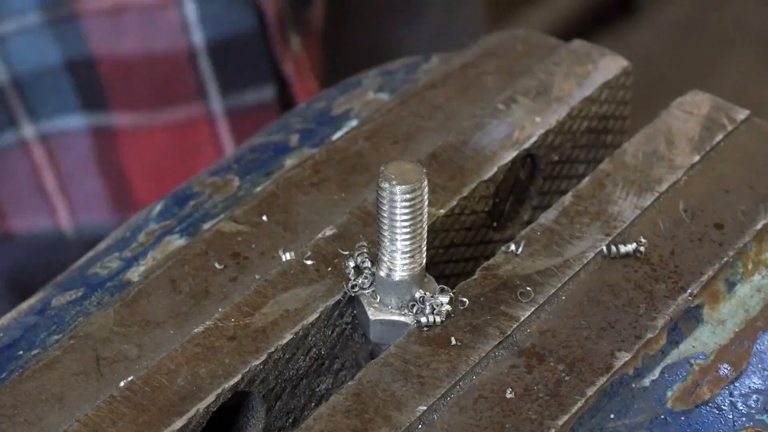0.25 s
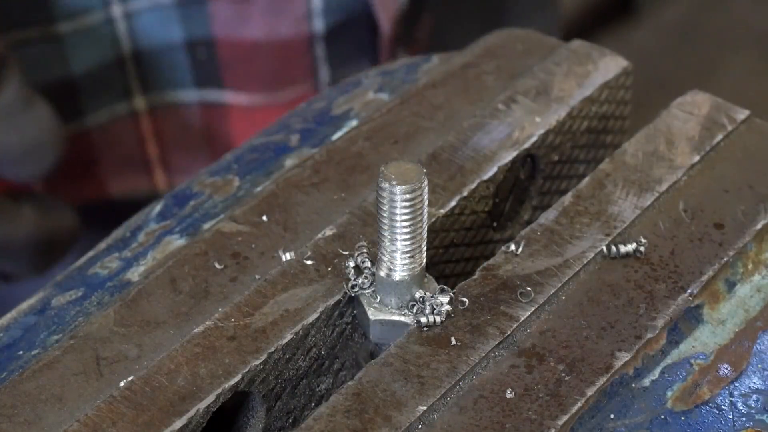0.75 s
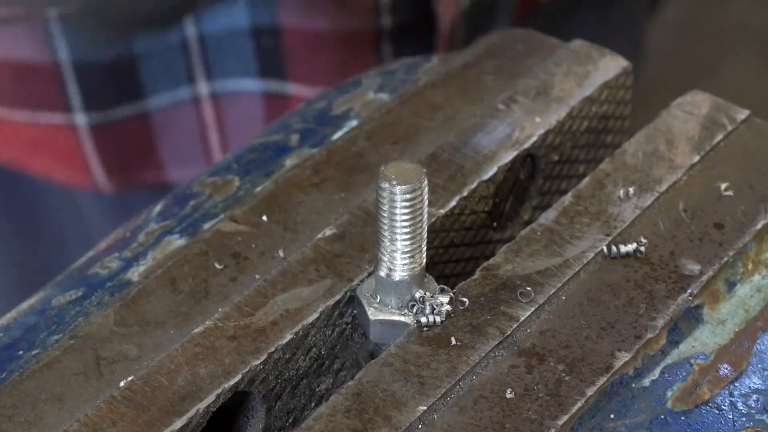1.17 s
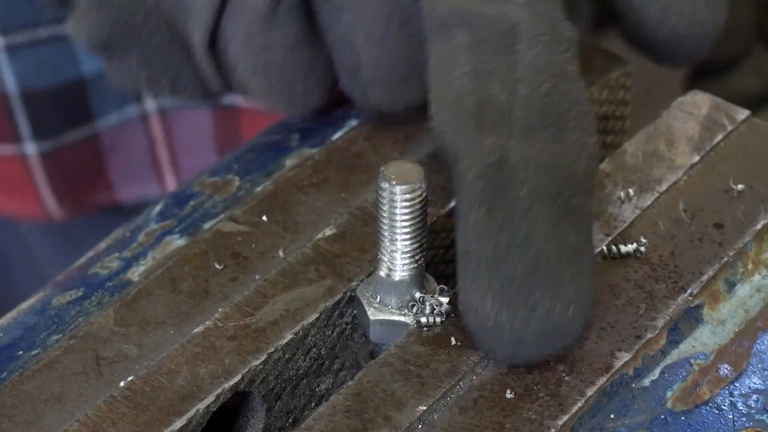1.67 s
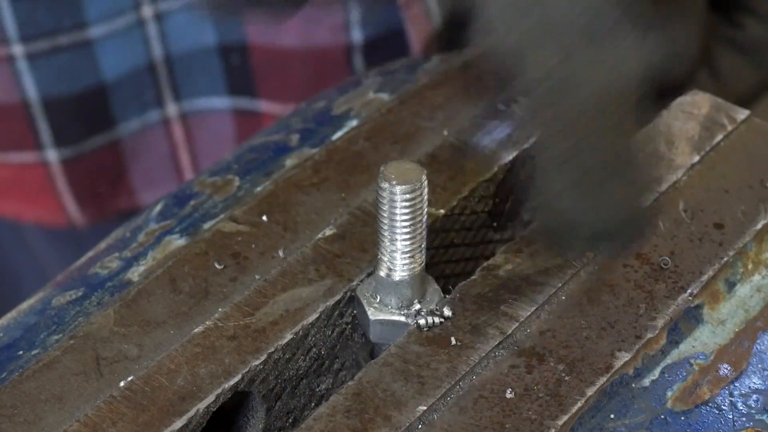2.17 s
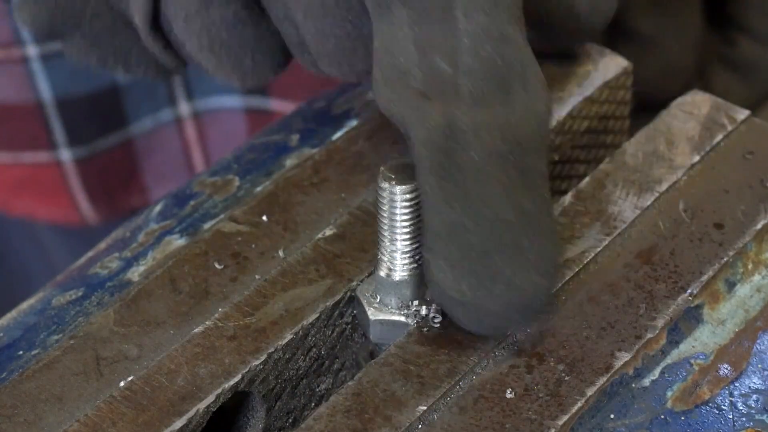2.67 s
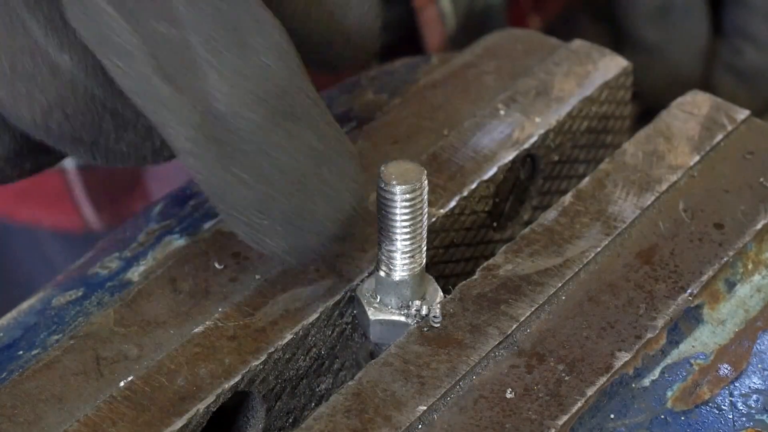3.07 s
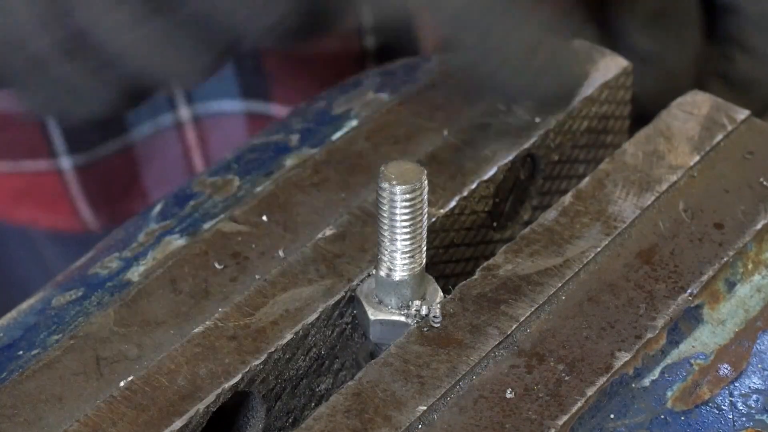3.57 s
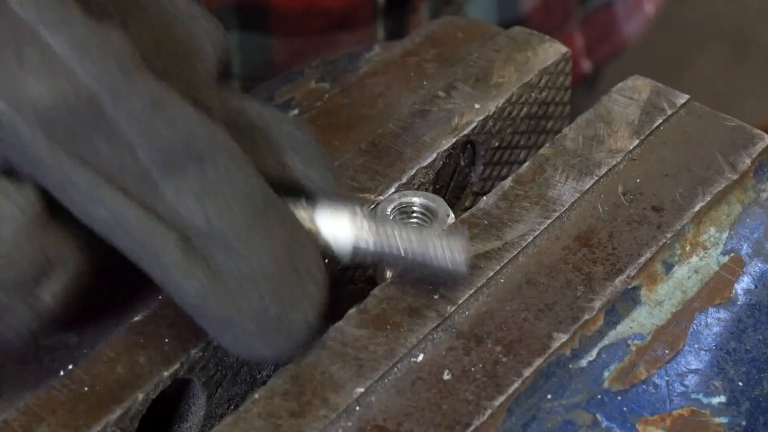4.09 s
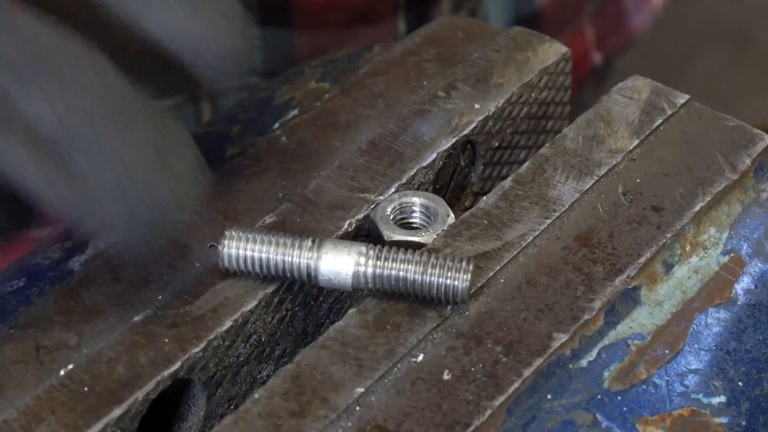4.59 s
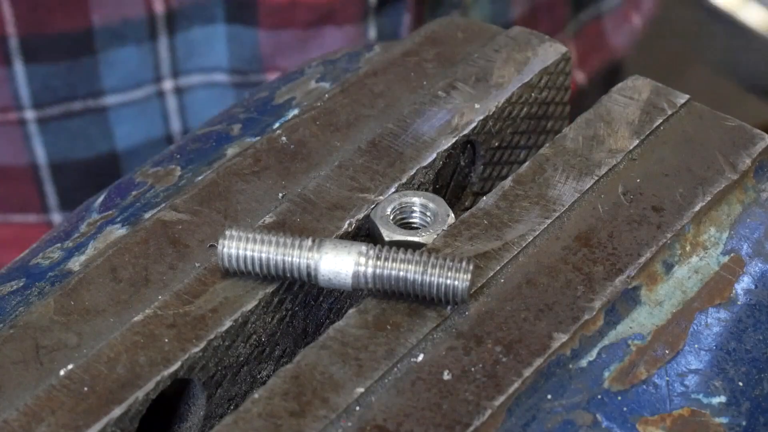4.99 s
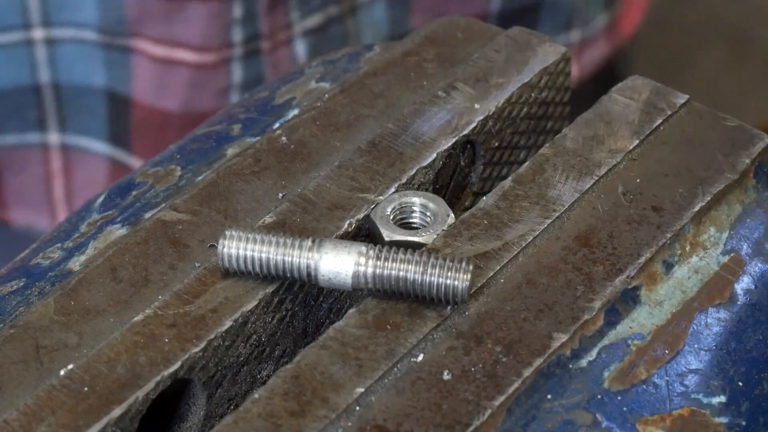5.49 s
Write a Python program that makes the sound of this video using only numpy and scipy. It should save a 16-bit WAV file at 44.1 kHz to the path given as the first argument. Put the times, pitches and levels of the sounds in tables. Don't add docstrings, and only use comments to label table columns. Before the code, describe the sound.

A quiet, small, dull workshop heard very close from the bench, nearly mono, with faint air and low body rumble. From 0 to 0.9 s there is only sleeve rustle, swelling at 0.3, soft low knocks around 0.45 to 0.55 and a barely audible creak at 0.75. At 0.92 a hand lands on wood with a dull slap. From 1.0 to 2.9 a gloved finger wipes metal chips off iron jaws in short, abrupt, gritty strokes, mid-range cloth rasp under bright swarf hiss, with dull taps and sharp ticks; the strongest scrapes come near 1.02 and 2.75. Chips ping clearly on thin sheet metal at 2.43 and 2.66, with a tiny bounce between. Lighter, drier strokes run from 2.9 to 4.0, sharpest near 3.55. A steel stud touches softly at 4.15, then clacks loudly at 4.35 with quick tiny bounces and short ringing. Faint wipes at 4.75 and 5.3 and cloth rustle fade out by 5.7.

```python
import sys
import numpy as np
from scipy import signal
from scipy.fft import rfft, irfft
from scipy.io import wavfile
from scipy.ndimage import uniform_filter1d

SR = 44100
rng = np.random.default_rng(int(sys.argv[2]) if len(sys.argv) > 2 else 0)


def store_wav(level_fs):
    pcm = np.round(np.clip(np.atleast_2d(level_fs), -1, 1) * 32767)
    wavfile.write(sys.argv[1], SR, pcm.T.astype(np.int16))


def boost(x):
    u = np.asarray(x, float) / 20
    return 10 ** u


N = 253134


def level(x, db):
    return x * boost(db) / np.sqrt(np.mean(x ** 2))


def band(x, lo_hz, hi_hz):
    return signal.sosfilt(signal.butter(2, [lo_hz, min(hi_hz, .45 * SR)], "band", fs=SR, output="sos"), x)


def colour(x, spectrum):
    hz, db = np.transpose(spectrum)
    grid = np.arange(1, 1026) * SR / 2050
    cepstrum = irfft(np.interp(np.log(grid), np.log(hz), db) * np.log(10) / 20)
    cepstrum[1:1024] *= 2
    cepstrum[1025:] = 0
    response = irfft(np.exp(rfft(cepstrum)))
    return signal.fftconvolve(x, response)[:N]


def walk(rate):
    hold = int(SR / rate)
    steps = np.repeat(rng.standard_normal(N // hold + 1), hold)
    return 0.81 * uniform_filter1d(steps, hold)[:N]


def add(out, s, sound, peak_db):
    i = int(round(s * SR))
    out[i:i + len(sound)] += boost(peak_db) * sound[:N - i] / np.abs(sound).max()


def fade(t60, length):
    t = np.arange(int(length * SR)) / SR
    return t, boost(-60 * t / t60)


def crack(lo_hz, hi_hz, t60):
    t, decay = fade(t60, .3)
    return band((rng.standard_normal(len(t)) + 4 * (t == 0)) * decay, lo_hz, hi_hz)


def ring(modes, rough, longest_s=0.37):
    hz, db, t60 = np.transpose(modes)[:, :, None]
    t = np.arange(int(.4 * SR)) / SR
    waver = uniform_filter1d(rng.standard_normal(size=(len(hz), len(t))), size=400) * 20
    loose = 1 + rough * waver * np.minimum(t / 0.0062, 1)
    sign = (-1) ** np.arange(len(hz))[:, None]
    decay = boost(-60 * t / np.minimum(t60, longest_s))
    body = sign * boost(db) * loose * decay * np.sin(2 * np.pi * hz * t)
    return band(body.sum(axis=0), .6 * hz.min(), 17000)


def grit(share, spread_db, patchy_db, surge_db):
    chance, sign, hardness = rng.random(size=(3, N))
    clicks = (chance < share) * np.sign(sign - .5) * boost(-spread_db * np.log(hardness + 0.0019))
    return clicks * boost(patchy_db * walk(230) + surge_db * walk(45))


# frequency in Hz, density in dB per Hz.
CHIP_HISS = [(1760, -26), (3000, -3.5), (3290, -3), (3520, -4), (3830, -3.5), (4500, -7), (4800, -6),
             (6620, -7.5), (7560, -5), (8520, -3.5), (9800, -10.5), (11600, -7), (13600, -4.5), (15300, -9),
             (16000, -26.5)]


def gritty(body, rub_db, hiss_db, spread_db, patchy_db, surge_db):
    rub = colour(grit(.16, spread_db, patchy_db, surge_db), body)
    hiss = colour(grit(.3, spread_db, 1.2, 0.54 * surge_db), CHIP_HISS)
    hiss = band(hiss, 3200, 20000)
    return boost(rub_db) * (level(rub, 0) + boost(hiss_db) * level(hiss, 0))


# frequency in Hz, density in dB per Hz.
SHOP_AIR = [(15, -65), (25, -44), (190, -8.5), (263, -4), (301, 1), (427, -23.5), (714, -24.5), (775, -30),
            (936, -8), (1160, -16), (16000, -35)]


def hush():
    air = colour(rng.standard_normal(N), SHOP_AIR) * boost(0.95 * walk(4.0))
    return level(air, -72)


# time in seconds, rustle in dB.
SLEEVE_LEVEL = [(0.0, -59.5), (0.12, -61), (0.31, -51), (0.36, -59.5), (0.55, -66), (1.21, -65.5),
                (1.69, -62.5), (2.1, -73), (2.33, -66), (2.93, -57), (3.18, -68.5), (3.6, -68), (3.93, -64),
                (4.03, -66.5), (4.4, -65), (4.6, -64.5), (5.23, -64), (5.74, -74.5)]
# frequency in Hz, density in dB per Hz.
CLOTH = [(290, -38), (500, 1.5), (943, -25.5), (1010, 4.5), (1100, -1.5), (1590, 0.5), (3680, -6.5),
         (6000, -12), (7800, -32), (13200, -120)]
# time in seconds, rumble in dB.
LEANING = [(0.0, -55.5), (0.06, -64), (0.32, -60), (0.5, -66), (1.2, -65.5), (2.05, -70), (2.68, -63),
           (3.5, -69), (4.3, -71.5), (4.75, -67), (4.97, -63), (5.35, -65.5), (5.74, -72.5)]
# time in seconds, rumble in dB.
BENCH_JOLTS = [
    (.54, -61),
    (0.934, -48),
    (1.4, -90),
    (1.729, -58),
    (1.95, -63),
    (2.73, -65),
    (3.55, -61),
    (4.155, -67),
    (4.355, -63),
]
# frequency in Hz, density in dB per Hz.
BENCH_RUMBLE = [(15, -57), (25, -34), (130, -11.5), (237, -4.5), (325, -5.5), (377, 0), (557, -5.5),
                (900, -4), (1170, -27), (1980, -120)]


def movement():
    t = np.arange(N) / SR
    rustle_db = np.interp(t, *np.transpose(SLEEVE_LEVEL))
    treble_db = -3.5 - 0.27 * (rustle_db + 61.5)
    shaking = boost(np.interp(t, *np.transpose(LEANING)))
    rise_db_s, fall_db_s = 800, 172.5
    for s, db in BENCH_JOLTS:
        shaking = shaking + boost(db - np.where(t < s, rise_db_s * (s - t), fall_db_s * (t - s)))
    low = colour(rng.standard_normal(N), BENCH_RUMBLE) * boost(2.1 * walk(25))
    rustle = gritty(CLOTH, rustle_db, treble_db, spread_db=0.5, patchy_db=2.0, surge_db=2.5)
    return level(low, 0.037) * shaking + band(rustle, 100, 11600)


# time in seconds, peak in dB, body pitch in Hz.
FINGER_TAPS = [(1.0198, -30, 1800), (1.0306, -23.5, 1600), (1.0644, -28.5, 2310), (1.0025, -34, 2000),
               (1.31, -34, 1500), (3.2065, -35, 1700), (3.2566, -30, 1900), (4.136, -46, 1400),
               (4.268, -46, 1400), (1.38, -28, 1710), (1.4008, -35, 1660), (2.114, -42, 1680),
               (2.145, -43, 1960), (3.68, -43, 2460), (1.6703, -39, 1690), (1.854, -45.5, 1240),
               (2.2947, -42.5, 1530), (1.9054, -46, 1840), (1.9728, -28, 1490), (1.9754, -32, 1690),
               (1.9895, -31, 1670), (1.992, -36, 1700), (2.17, -37, 1910), (1.515, -40, 1650),
               (1.0237, -27.5, 1800), (2.3386, -34, 1900), (2.343, -29, 1450), (2.923, -34, 1500),
               (2.952, -35, 1930), (2.968, -35, 1947), (3.006, -36.5, 1880), (3.0938, -44.5, 1800),
               (3.1967, -29.5, 1450), (3.2367, -41, 2200), (3.2681, -29, 1900), (3.5382, -23, 1600),
               (3.575, -26, 1820), (3.601, -29, 2400), (4.1225, -39.5, 2200), (4.22, -50, 2500),
               (.313, -51, 1700)]
# time in seconds, peak in dB, body pitch in Hz.
CHIP_TICKS = [(1.2242, -40, 3700), (1.231, -42.5, 2040), (1.346, -29, 1700), (1.36, -28, 1800),
              (1.7225, -33.5, 2040), (2.397, -29, 2700), (1.6896, -33.5, 1430), (4.571, -46, 2000),
              (3.766, -52, 3600), (.5365, -42, 1500), (4.766, -43, 1700), (2.1, -42, 1100),
              (1.945, -33.5, 1300), (2.348, -30.5, 1560), (3.6, -37, 2000), (2.752, -27, 1900),
              (2.7585, -27, 2300), (3.1945, -32, 1900), (3.2984, -32, 1700)]


def taps_and_ticks():
    out = np.zeros(N)
    kinds = [(FINGER_TAPS, -6.5, 0.012, 6000), (CHIP_TICKS, 0, 0.0093, 9500)]
    for hits, treble_db, t60, top_hz in kinds:
        for s, peak_db, hz in hits:
            t, decay = fade(t60, 0.028)
            burst = (rng.standard_normal(size=(2, len(t))) + 7 * (t == 0)) * decay
            body = band(band(burst[0], hz * 0.68, hz * 1.47), hz * 0.45, hz * 3.6)
            add(out, s, body, peak_db)
            add(out, s, band(burst[1] * decay, 2900, top_hz), peak_db + treble_db)
    return out


# time in seconds, peak in dB, pitch in Hz, t60 in seconds.
BENCH_KNOCKS = [
    (0.439, -40.5, 570, 0.032),
    (0.537, -40.5, 225, 0.066),
    (0.572, -46, 275, 0.1),
    (4.742, -46, 445, 0.037),
    (1.404, -38.5, 754, 0.021),
    (3.431, -53, 188, 0.096),
]
# time in seconds, peak in dB, pitch in Hz, t60 in seconds.
FINGER_THUDS = [
    (1.339, -47, 184, 0.081),
    (1.947, -52, 130, 0.072),
    (2.718, -56, 59, 0.082),
    (3.196, -54, 95, 0.054),
    (2.345, -54.5, 140, .06),
    (2.15, -57, 130, .06),
]


def knocks():
    out = np.zeros(N)
    for s, peak_db, hz, t60 in BENCH_KNOCKS + FINGER_THUDS:
        add(out, s, crack(hz * 0.63, hz * 1.69, t60), peak_db)
    return out


# time in seconds, peak in dB.
BENCH_CREAKS = [
    (.7, -62),
    (0.749, -54.5),
]


def creaks():
    out = np.zeros(N)
    for s, peak_db in BENCH_CREAKS:
        add(out, s, ring([(462, 0, .12)], rough=0.32), peak_db)
    return out


# time in seconds, peak in dB.
HAND_SLAPS = [
    (0.9235, -29.5),
    (0.9346, -38.5),
]
# frequency in Hz, level in dB, t60 in seconds.
PLANK_MODES = [(349, -5.5, 0.17), (432, 3.5, 0.029), (523, -4, 0.071), (868, -1, 0.041), (159.5, -15, 0.3),
               (680, -12, 0.097)]


def slaps():
    out = np.zeros(N)
    for s, peak_db in HAND_SLAPS:
        add(out, s, ring(PLANK_MODES, rough=0.31), peak_db)
        add(out, s, crack(680, 4100, t60=0.32), peak_db - 4.5)
        add(out, s, crack(280, 1150, t60=0.35), peak_db - 10)
        add(out, s, crack(4000, 15000, t60=0.23), peak_db - 21)
    return out


# landing, fastest moment and lift in seconds, rub in dB, chip hiss in dB re rub.
SINGLE_WIPES = [
    (4.742, 4.758, 4.85, -52, -2.5),
    (5.302, 5.342, 5.385, -59.5, -9),
    (4.16, 4.33, 4.73, -63, -25),
]
# landing in seconds, length in seconds, rub in dB, chip hiss in dB re rub.
BRIEF_DABS = [(1.222, 0.025, -56, 0), (1.681, .012, -52, 1), (2.346, 0.016, -51, 3.5),
              (4.118, .028, -53, -12), (4.545, .04, -61, -0.5), (2.298, 0.015, -63, 7.5),
              (4.87, 0.06, -69, 2.5), (3.99, 0.16, -66.5, 2.5), (1.085, 0.03, -58, -1),
              (1.11, 0.13, -69, 0.5), (2.42, 0.024, -46, 3), (1.512, 0.0094, -53.5, -3.5),
              (5.16, 0.085, -63, -5), (3.12, .07, -66.5, -8), (4.255, .09, -61, -12)]
# time in seconds, rub in dB, chip hiss in dB re rub.
LONG_STROKES = [
    [(0.983, -53, -5), (1.021, -38, 0), (1.027, -41.5, 5), (1.039, -42, 1), (1.083, -47, 5.5),
     (1.092, -51, -7)],
    [(1.307, -66, -3), (1.31, -46.5, -12), (1.323, -44.5, -2), (1.357, -41.5, 1.5), (1.405, -47, -3.5),
     (1.413, -64, -1), (1.425, -65, 0)],
    [(1.703, -77, -13), (1.711, -53, 0), (1.725, -47.5, 7), (1.753, -44, 2), (1.783, -51, 1.5),
     (1.811, -51, -12), (1.83, -70, -6)],
    [(1.897, -65, -9), (1.905, -52, -14), (1.955, -47, -3.5), (1.993, -43, -2.5), (2.009, -50.5, 4.5),
     (2.041, -63, -1), (2.057, -55.5, -14), (2.065, -71, -7)],
    [(2.103, -63, -14), (2.113, -50, -15), (2.145, -43.5, -14), (2.157, -52.5, -9.5), (2.193, -51, 8.5),
     (2.225, -54.5, 0.5), (2.239, -64, -3), (2.25, -83, 7)],
    [(2.362, -62, 6), (2.382, -42, 1), (2.402, -40.5, 2), (2.424, -53, 12.5)],
    [(2.505, -65, 1), (2.537, -48.5, -8), (2.555, -48.5, -14), (2.569, -57.5, 7), (2.587, -39.5, -5.5),
     (2.601, -50, 2), (2.617, -46, -0.5), (2.645, -79, -5)],
    [(2.71, -52, -16), (2.718, -45, -8), (2.726, -44.5, 6.5), (2.748, -37, 3), (2.826, -57, 0.5),
     (2.864, -48, -11), (2.895, -68, -6)],
]
# time in seconds, rub in dB, chip hiss in dB re rub.
LATER_STROKES = [
    [(2.895, -63, -4), (2.929, -46, -6.5), (2.943, -66, -5), (2.953, -49, -15), (2.961, -51.5, -6.5),
     (3.023, -58.5, -6), (3.055, -49, -5), (3.1, -59, -21)],
    [(3.21, -48, -8), (3.22, -59, -1), (3.25, -49, -2), (3.258, -45.5, -8), (3.272, -44.5, -4),
     (3.28, -64, -8)],
    [(3.28, -61, -10), (3.296, -48, -7), (3.354, -43.5, -3.5), (3.388, -61, -0.5), (3.424, -50.5, -6),
     (3.44, -66, -5)],
    [(3.455, -70, -5), (3.481, -54, -8), (3.499, -60, -7), (3.511, -54, -9), (3.531, -50, 1),
     (3.533, -53, -8)],
    [(3.546, -51, -5), (3.548, -55, -5), (3.578, -38.5, -1.5), (3.632, -56.5, 3), (3.654, -50, -9),
     (3.66, -62, 1), (3.682, -50.5, -17), (3.7, -73, 1)],
    [(3.825, -64, -2), (3.833, -58, -3), (3.869, -63.5, 3.5), (3.903, -50.5, -4.5), (3.941, -49, -7.5),
     (3.975, -59.5, -3), (3.985, -63, -8), (4.0, -65, 0)],
]


def stroke_gains():
    t, rub, hiss = np.arange(N) / SR, np.zeros(N), np.full(N, 1e-9)
    landing_s, lift_s = .005, .021
    round_top = 1.315
    dabs = [(s, s + 0.63 * length, s + length, db, rel_db) for s, length, db, rel_db in BRIEF_DABS]
    for lands, fastest, lifts, db, rel_db in SINGLE_WIPES + dabs:
        s = [lands - landing_s, lands, fastest, lifts, lifts + lift_s]
        on = (t > s[0]) & (t < s[-1])

        def arch(lands_db, lifts_db):
            drop_db = np.abs([lands_db - 25, lands_db, 0, lifts_db, lifts_db - 30])
            return boost(db - np.interp(t[on], s, drop_db ** (1 / round_top)) ** round_top)

        rub[on] = np.maximum(rub[on], arch(-7, -14.5))
        hiss[on] = np.maximum(hiss[on], boost(rel_db) * arch(-8, -12.5))
    for s, db, rel_db in map(np.transpose, LONG_STROKES + LATER_STROKES):
        edge_db = np.interp(t, [s[0] - landing_s, s[0], s[-1], s[-1] + landing_s], [-80, 0, 0, -80])
        gain = boost(np.interp(t, s, db) + edge_db - 0.15)
        rub = np.maximum(rub, gain)
        hiss = np.maximum(hiss, gain * boost(np.interp(t, s, rel_db)))
    return rub, hiss


# frequency in Hz, density in dB per Hz.
CLOTH_ON_IRON = [(290, -53), (500, -13.5), (790, -9.5), (1050, -9), (1290, -3), (2010, -0.5), (2690, -8.5),
                 (3600, -13), (3880, -15.5), (4770, -13), (6000, -21.5), (7800, -31), (13200, -120)]
# time in seconds, jingle in dB re chip hiss, finest dust in dB.
LOOSE_CHIPS = [(1.04, -7.5, -1.5), (1.35, -6.5, -1.5), (1.75, -8.5, 3.5), (1.97, -12, 2.5),
               (2.19, -3.5, 0.5), (2.4, -10, -3), (2.59, -7, 1.5), (2.76, -9.5, 1.5), (3.0, -12, -3),
               (3.33, -12, -2.5), (3.6, -15, -3), (3.93, -5.5, -1), (4.099, -4, -6), (4.8, -9, -4.5)]
CHIP_BAND = (7220, 9070)
# low edge in Hz, high edge in Hz.
JAW_ZONES = [(900, 1500), (1500, 2300), (2300, 3600), (4000, 7200)]
# time in seconds, frequency in Hz.
JAW_ANSWER = [(0.98, 2000), (1.03, 1750), (1.07, 2320), (1.32, 1600), (1.38, 1900), (1.73, 1900),
              (1.8, 2120), (1.92, 1650), (2.13, 1600), (2.2, 2100), (2.4, 2060), (2.53, 1540), (2.6, 1800),
              (2.76, 2020), (2.86, 1600), (3.25, 1690), (3.35, 1800), (3.62, 2200)]
ANSWER_HZ = (1350, 1600, 1900, 2250, 2640)


def wipes():
    t = np.arange(N) / SR
    rub, hiss = stroke_gains()
    chip_s, jingle_db, dust_db = np.transpose(LOOSE_CHIPS)
    jingle = band(grit(0.081, 3.9, 2.0, 0.93), *CHIP_BAND)
    jingle = level(band(jingle, *CHIP_BAND), 0)
    jingle = jingle * hiss * boost(np.interp(t, chip_s, jingle_db))
    shake = level(band(rng.standard_normal(N), 25, 140), -47.0) * rub ** 0.62
    hiss_db = 20 * np.log10(hiss / (rub + 1e-9))
    scrape = rub * gritty(CLOTH_ON_IRON, 0, hiss_db, spread_db=3.0, patchy_db=2.5, surge_db=1.5)
    scrape = scrape + sum((boost(1.65 * walk(50)) - 1) * band(scrape, *zone) for zone in JAW_ZONES)
    answer_hz = np.interp(t, *np.transpose(JAW_ANSWER))
    answers = np.zeros(N)
    for hz in ANSWER_HZ:
        nearness = np.exp(-(np.log(answer_hz / hz) / 0.15) ** 2)
        answers += boost(-6.5) * nearness * band(scrape, hz / 1.097, hz * 1.092)
    scrape = scrape + answers
    dust = signal.sosfiltfilt(signal.butter(2, 10100, "high", fs=SR, output="sos"), scrape)
    return shake + jingle + scrape + (boost(np.interp(t, chip_s, dust_db)) - 1) * dust


# time in seconds, peak in dB.
CHIP_PINGS = [
    (2.4269, -22),
    (2.4756, -36.5),
    (2.658, -23),
]
# frequency in Hz, level in dB, t60 in seconds.
SHEET_FIRST = [(3031, -16, 5.0), (3268, -18, 5.0), (3591, -9, 0.28), (3795, -16, 0.25), (4059, -16, 0.2),
               (4296, -7, 0.2), (4619, -16, 0.22), (4947, -6, 0.12), (5297, -20, 0.4), (5593, 0, 0.13),
               (5981, -28, .5), (6191, -18, 0.3), (6498, -26, 0.78), (7025, -17, 0.27), (7494, -9, 0.1),
               (7849, -13, 0.15), (8597, -11, 0.1), (8856, -15, 0.22), (4910, -3, .13), (8260, 3, .06),
               (6950, -3, .1), (9800, -11, .15), (12540, -10, .06), (13050, -15, .05)]
# frequency in Hz, level in dB, t60 in seconds.
SHEET_SECOND = [(4296, -15, 0.12), (4910, -9, 0.07), (6309, -22, 0.22), (6508, -13, 0.14), (6918, -9, 0.12),
                (7397, -5, 0.059), (7773, -18, 0.24), (7957, -13, 0.12), (8096, -9, 0.096),
                (8263, -10, 0.1), (8689, -3, 0.026), (9787, -7, 0.07), (10210, -21, 0.07),
                (10900, -30, 0.14), (3030, -22, .7), (3270, -23, .5), (3590, -24, .3), (5595, -20, .13)]
# frequency in Hz, level in dB, t60 in seconds.
SHEET_HIGHEST = [(11200, -2, 0.13), (11900, -3, 0.13), (12410, -4, 0.14), (13200, -4, 0.18),
                 (14030, -2, 0.12), (14670, 0, 0.1)]


def pings():
    out = np.zeros(N)
    for (s, peak_db), modes in zip(CHIP_PINGS, (SHEET_FIRST, SHEET_FIRST, SHEET_SECOND)):
        add(out, s, ring(modes, rough=0.24, longest_s=0.88), peak_db - 3.0)
        add(out, s, crack(5200, 10000, t60=0.084), peak_db - 3.5)
    s, peak_db = CHIP_PINGS[2]
    add(out, s, ring(SHEET_HIGHEST, rough=.4), peak_db - 17)
    return out


# time in seconds, peak in dB.
STUD_TOUCHES = [
    (4.148, -34),
    (4.1533, -36),
]
# time in seconds, stud ring in dB, vice ring in dB, contact crack in dB.
STUD_CLACKS = [
    (4.349, -18.5, -31.5, -12.5),
    (4.3542, -43.5, -19.5, -36),
    (4.3621, -30.5, -30.5, -27.5),
    (4.3678, -44.5, -33, -33),
]
# frequency in Hz, level in dB, t60 in seconds.
JAW_MODES = [(754, 0, 0.0835), (1266, -4.5, 0.13), (1553, 1, 0.06), (1800, -14.5, 0.12), (2163, -14, 0.065),
             (1293, -15.5, 0.49), (754, -18, 0.43)]
# frequency in Hz, level in dB, t60 in seconds.
STUD_MODES = [(2500, -18.0, 0.087), (2740, -6.0, 0.022), (3115, -17.0, 0.13), (3390, -4.5, 0.03),
              (3730, -36.0, 0.16), (4430, -26.5, 0.21), (5560, -31, .2), (7200, -19, 0.14),
              (7240, -22, 0.29), (7000, 0.0, 0.026), (8242, -37.0, 0.96), (7800, -16.5, 0.107),
              (9500, -34.5, 0.18), (9500, -26.0, 0.24), (10310, -26.0, 0.24), (10700, -27.5, 0.18),
              (11000, -37.5, 0.2), (7030, -7.0, 0.027), (8600, -0.5, 0.037), (4610, -18, 0.23),
              (4420, -25, 0.11), (3130, -25, .17)]
# frequency in Hz, level in dB, t60 in seconds.
VICE_MODES = [(1475, 0.5, 0.043), (1585, -14, .09), (1245, -14, .15), (1843, -4.5, .04), (793, -19, 0.062),
              (500, -20.5, .04), (2200, -14.5, .04), (2930, -10.5, .05), (1500, -25, .5),
              (1583, -26.5, .45), (2354, -33.5, .4), (1744, -31, .36), (2540, -28, .19)]
# frequency in Hz, level in dB, t60 in seconds.
THREAD_MODES = [(6870, 15, 0.02), (4400, 8, .03), (9300, -1, .06), (10600, -9, .07), (11800, -3, .05),
                (12700, -4, .06), (13600, -7, .07)]
# frequency in Hz, level in dB, t60 in seconds.
SNAP_MODES = [(7550, 2, 0.002), (12700, 0, 0.0013), (4450, -22, .003)]


def stud():
    out = np.zeros(N)
    touch_s = STUD_TOUCHES[0][0]
    add(out, touch_s, ring(THREAD_MODES, rough=.7), -45)
    add(out, touch_s, crack(4000, 15500, t60=.012), -42)
    for s, peak_db in STUD_TOUCHES:
        add(out, s, ring(JAW_MODES, rough=0.35, longest_s=.45), peak_db)
        add(out, s, band(crack(790, 2900, t60=0.091), 769, 4500), peak_db - 2.5)
    for s, stud_db, vice_db, crack_db in STUD_CLACKS:
        add(out, s, ring(STUD_MODES, rough=0.94, longest_s=0.38), stud_db)
        add(out, s, ring(VICE_MODES, rough=.6, longest_s=.6), vice_db)
        add(out, s, crack(4800, 16000, t60=0.0064), crack_db)
    add(out, 4.3488, ring(SNAP_MODES, rough=0), -3)
    add(out, STUD_CLACKS[0][0], crack(730, 7600, t60=0.21), -30)
    add(out, STUD_CLACKS[1][0], crack(1200, 1900, t60=0.56), -45)
    return out


def room(near):
    t, decay = fade(0.13, .3)
    tail = rng.standard_normal(len(t)) * decay
    tail = band(tail * (t > .003), 100, 6140)
    tail /= np.sqrt(np.sum(tail ** 2))
    return boost(-20.5) * signal.fftconvolve(near, tail)[:N]


# frequency in Hz, level in dB.
PORT_TILT = [(60, -3.5), (150, -0.5), (1000, -2), (2500, -2), (8000, -2), (13000, 1.5)]


def port_difference(strokes, near):
    wide = (strokes + 0.17 * near) * 1.7 * walk(110)
    return boost(-15) * colour(wide, PORT_TILT) + level(rng.standard_normal(N), -70.5)


def scene():
    air = hush()
    strokes = movement() + wipes()
    near = strokes + taps_and_ticks() + knocks() + creaks() + slaps() + pings() + stud()
    mid = near + room(near) + air
    side = port_difference(strokes, near)
    return np.array([mid + side, mid - side])


def thin_side(dry, mask_db, scatter_db):
    mid, side = signal.stft([dry[0] + dry[1], dry[0] - dry[1]], nperseg=2048, noverlap=1536)[2] / 2
    mid_power, side_power = [uniform_filter1d(np.abs(z) ** 2, size=24, axis=0)[::24, ::2] for z in (mid, side)]
    threshold_db = mask_db + scatter_db * rng.standard_normal(mid_power.shape)
    keep = side_power > mid_power * boost(2 * threshold_db)
    keep = np.repeat(np.repeat(keep, 24, axis=0), 2, axis=1)[:len(side), :side.shape[1]]
    lost = signal.istft(side * ~keep, nperseg=2048, noverlap=1536)[1][:N]
    return dry - lost * np.array([[1], [-1]])


def low_pass(x):
    return signal.sosfilt(signal.butter(12, 16950, fs=SR, output="sos"), x)


def record(dry):
    top_cut = signal.ellip(8, .3, 45, 15650, fs=SR, output="sos")
    mix = thin_side(signal.sosfilt(top_cut, dry), mask_db=-13, scatter_db=7)
    return low_pass(mix)


dry = scene()
out = record(dry)
store_wav(out)
```